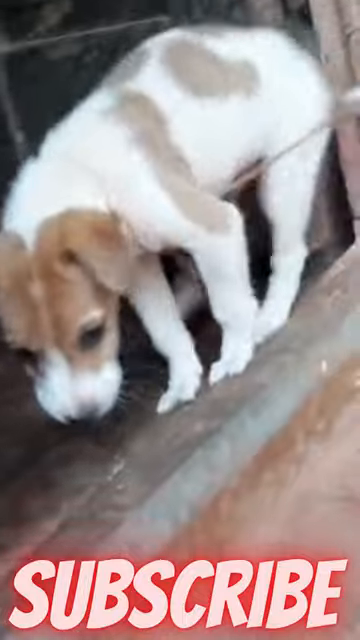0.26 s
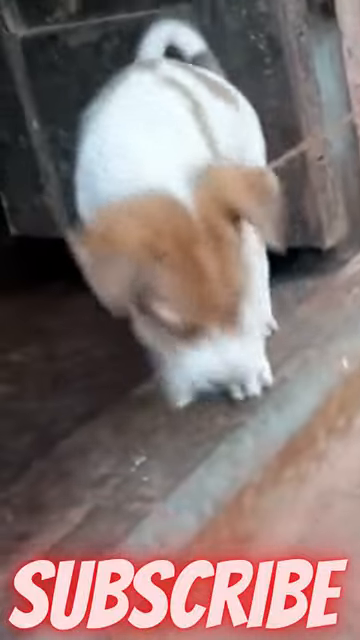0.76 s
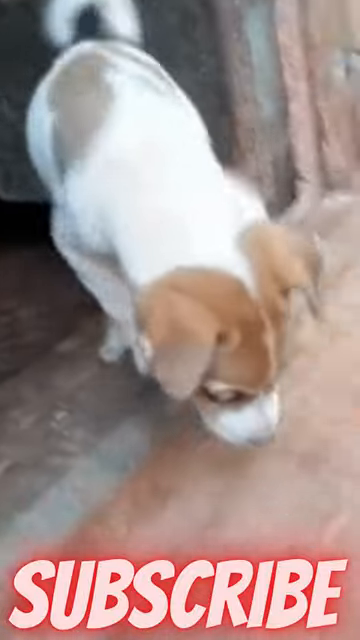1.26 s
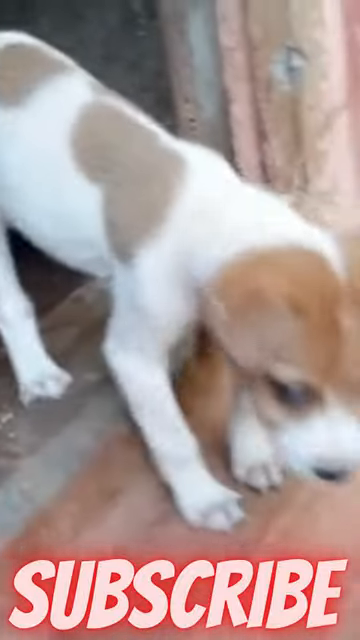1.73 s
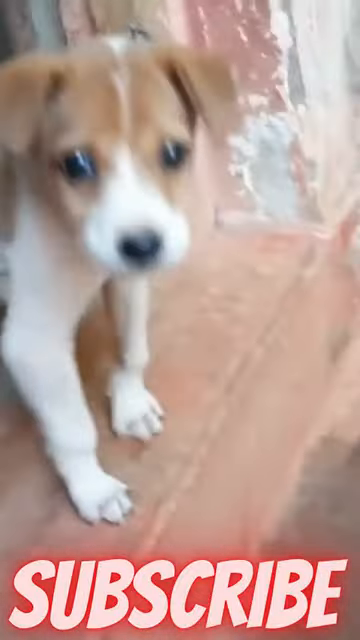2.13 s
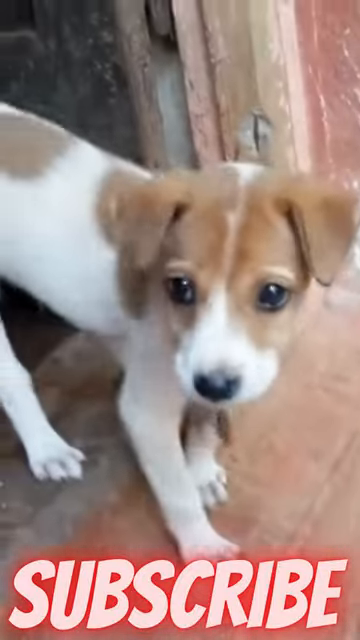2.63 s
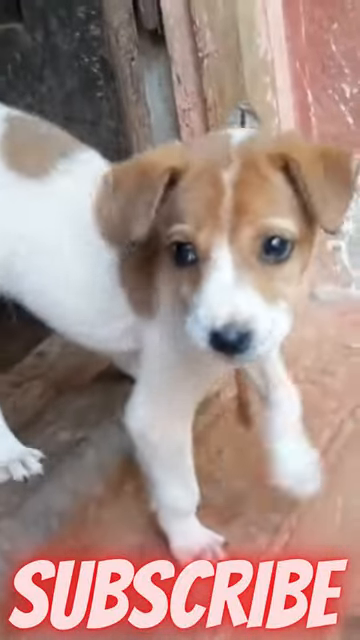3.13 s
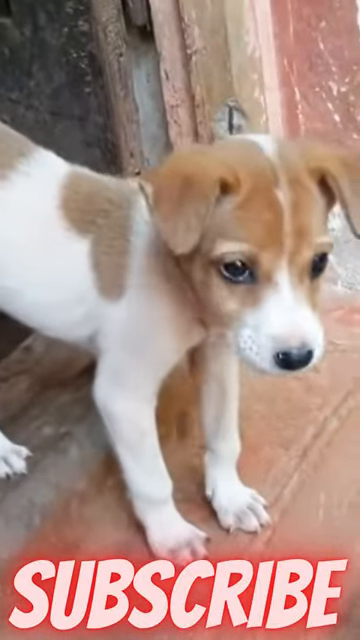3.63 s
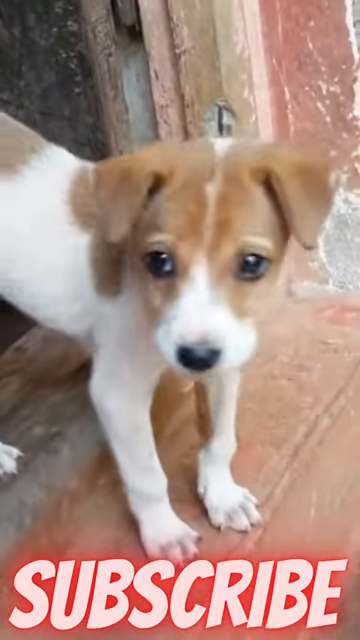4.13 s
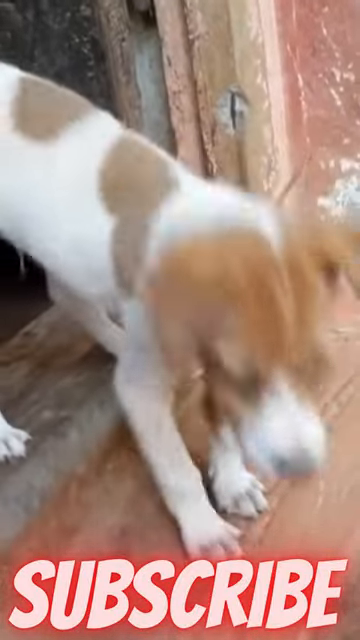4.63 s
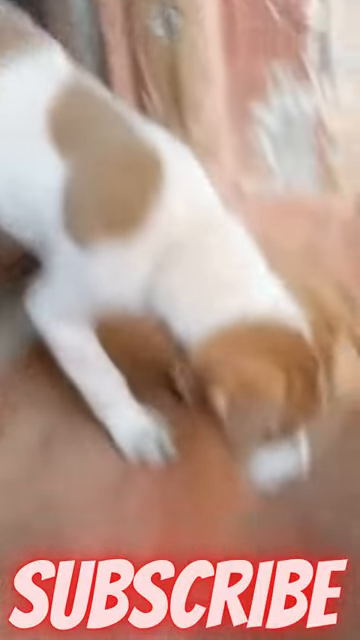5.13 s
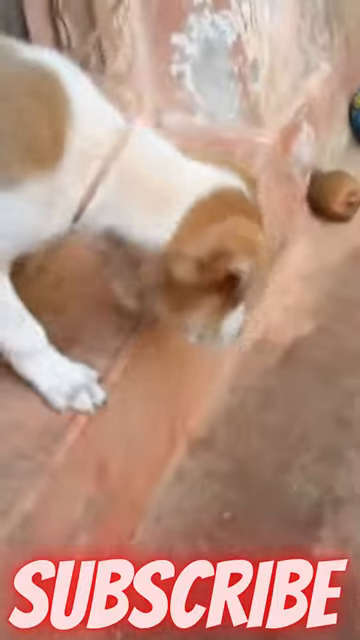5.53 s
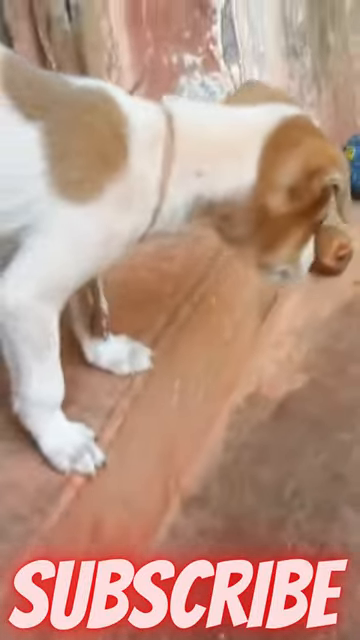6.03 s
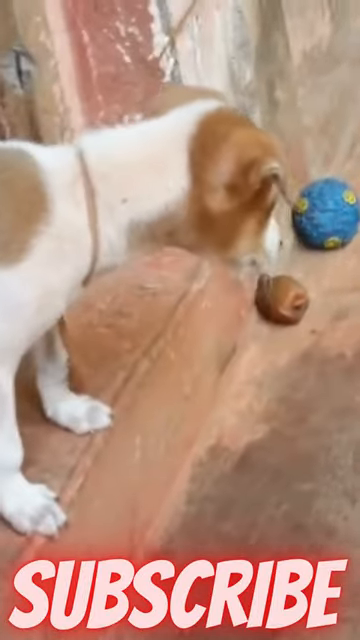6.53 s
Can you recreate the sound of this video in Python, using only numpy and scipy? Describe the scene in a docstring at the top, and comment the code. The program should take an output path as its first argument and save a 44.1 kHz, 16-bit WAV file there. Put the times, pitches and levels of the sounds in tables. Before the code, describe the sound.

At the start a puppy gives a faint, fading yelp over a dull hum that dies away within about half a second. Small grunts, soft paw scuffs and a few claw ticks on concrete follow until about 2 seconds. Then a wooden door is bumped with a hollow knock and rattle, and drags with a low rumble that fades by about 3.5 seconds. The puppy begins short, high, nearly pure whines at about 2.7, 3.5, 4.1 and 4.4 seconds. At 4.8 seconds comes a sharp rising yelp, the loudest sound, followed by a softer warbling yelp at 5.1 seconds. Three quieter, lower whines follow at about 5.5, 5.8 and 6.2 seconds, the last starting with a grunt. Quiet outdoor air lies underneath throughout, and the porch walls add a faint echo.

```python
"""A puppy on a concrete porch yelps over a dying hum and quiet outdoor air; the walls answer faintly.
It grunts, its paws scuff and its claws tick. At two seconds a wooden door is bumped, rings in its
modes and rumbles as it drags. As the rumble fades, nine high calls begin: four whines, a loud yelp,
a warbling yelp and three more whines, the last with a grunt. The vocal folds give a near-pure tone
that brightens under strain, carries a thin whistle and now and then cracks by period doubling."""
import sys
import numpy as np
from scipy import signal
from scipy.fft import rfft, irfft
from scipy.io import wavfile
from scipy.ndimage import uniform_filter1d

SR = 44100
rng = np.random.default_rng(int(sys.argv[2]) if len(sys.argv) > 2 else 0)


def log_audio(samples):
    """Write samples as a 16-bit WAV file to the path given in sys.argv[1]."""
    # one column per channel
    frames = np.atleast_2d(samples).T
    # limit to full scale, then quantise
    limited = np.clip(frames, -1, 1)
    pcm = np.round(limited * 32767).astype(np.int16)
    wavfile.write(sys.argv[1], SR, pcm)


N = 299420
T = np.arange(N) / SR
CUTOFF_HZ = 15750

# vocal tract response, mouth nearly shut and wide open: frequency_hz, gain_db
MOUTH_SHUT = [(2000, 4), (2700, -0.5), (3400, -14), (4200, -4), (5150, 11.5), (5900, -5.5), (7000, -14),
              (8150, -17), (9200, -31.5), (10700, -18), (12000, -28), (15000, -35.5)]
MOUTH_OPEN = [(2000, 1), (2850, -16.5), (3400, -4), (3850, 1.5), (4300, -5), (4750, -2), (5600, -4),
              (6600, -16.5), (9000, -41.5), (15000, -52)]
# spectrum of friction on concrete: frequency_hz, gain_db
FRICTION_SPECTRUM = [(500, -10.5), (1300, 6), (2400, -1), (4900, 2), (6500, -4.5), (9000, -19.5),
                     (15000, -18.5)]


def from_db(db):
    """Decibels to amplitude ratio."""
    return 10 ** (np.asarray(db) / 20)


def unit_rms(x):
    """Normalisation to unit rms."""
    return x / np.sqrt(np.mean(x ** 2) + 1e-20)


def gain_at(spectrum, hz):
    """Gain of a (frequency_hz, gain_db) spectrum, interpolated on logarithmic axes."""
    frequency_hz, gain_db = np.transpose(spectrum)
    return from_db(np.interp(np.log(np.maximum(hz, 1)), np.log(frequency_hz), gain_db))


def colour(x, spectrum, size=4096):
    """Minimum-phase filtering: folding the cepstrum makes the response causal."""
    cepstrum = irfft(np.log(gain_at(spectrum, np.arange(size // 2 + 1) * SR / size)))
    cepstrum[1:size // 2] *= 2
    cepstrum[size // 2 + 1:] = 0
    return signal.fftconvolve(x, irfft(np.exp(rfft(cepstrum))))[:len(x)]


def noise(spectrum, size=N):
    """Spectrally shaped Gaussian noise of unit rms."""
    return unit_rms(colour(rng.standard_normal(size), spectrum))


def wander(rate_hz, size):
    """Low-passed noise: a smooth random fluctuation of unit rms."""
    pole = np.exp(-2 * np.pi * rate_hz / SR)
    white = rng.standard_normal(size + SR // 10)
    return unit_rms(signal.lfilter([1], [1, -2 * pole, pole * pole], white)[-size:])


def resonate(x, hz, width_hz):
    """A second-order resonator with unit peak gain."""
    radius = np.exp(-np.pi * width_hz / SR)
    feedback = [1, -2 * radius * np.cos(2 * np.pi * hz / SR), radius ** 2]
    return signal.lfilter(np.array([1, 0, -1]) * (1 - radius ** 2) / 2, feedback, x)


def gate(t, start, end, edge_s):
    """A time window with raised-cosine edges."""
    return np.sin(np.pi / 2 * np.clip(np.minimum(t - start, end - t) / edge_s + .5, 0, 1)) ** 2


def add(out, start_s, x):
    """Superposition of a short sound at a given time."""
    i = max(round(start_s * SR), 0)
    out[i:i + len(x)] += x[:N - i]


def overtone_gains(pitch_hz, opening, throat_ratio, octave_db, knee_order=5.3, fall_db_per_order=2):
    """Source-filter model: the tract weights harmonics 2-16 of the folds; their total power is one."""
    orders = np.arange(2, 17)[:, None]
    hz = orders * pitch_hz
    tract_hz = hz * throat_ratio   # a longer throat lowers all its resonances
    gains = gain_at(MOUTH_OPEN, tract_hz) ** opening * gain_at(MOUTH_SHUT, tract_hz) ** (1 - opening)
    gains *= from_db(-fall_db_per_order * np.maximum(orders - knee_order, 0)) * (hz < CUTOFF_HZ)
    gains[0] *= from_db(octave_db)
    return gains / np.linalg.norm(gains, axis=0)


def whistle(progress, fold_phase, hoarse_db, jet_db=-12):
    """A jet tone, phase-modulated into sidebands by the folds; part of the jet breaks up into hiss."""
    # pitch arch over a call: share_of_call, pitch_hz
    arch = [(0, 11500), (.3, 13230), (1, 12510)]
    size = len(progress)
    hz = np.interp(progress, *np.transpose(arch))
    hz *= 1 + .008 * wander(25, size) + (.003 + .07 * from_db(hoarse_db)) * wander(400, size)
    tone = np.sin(2 * np.pi * np.cumsum(hz) / SR + 1.8 * np.sin(fold_phase))
    tone *= from_db(2 * wander(30, size))
    jet = unit_rms(resonate(rng.standard_normal(size), 12500, width_hz=3300))
    return tone + from_db(jet_db) * jet


def squeak(from_end_s, end_hz=13040, fall_hz_per_s=19000):
    """A falling chirp: the whistle runs free as a call ends."""
    hz = (end_hz - fall_hz_per_s * from_end_s) * (1 + .028 * wander(460, len(from_end_s)))
    return np.sin(2 * np.pi * np.cumsum(hz) / SR)


def cry(contour, opening, throat_ratio, octave_db, quiver, hoarse_db, whistle_db, squeak_db,
        rasp_db=-5, hiss_db=2, puff_db=-8.5, whistle_swell_db=9, squeak_s=.0098):
    """Phonation: vibrating folds give harmonics and pulse the airflow. Returns start time and sound."""
    # voice cracks: centre_s, half_width_s, depth_ratio
    cracks = [(2.735, 0.0438, 0.21), (4.611, 0.0064, 0.01), (4.838, .015, 0), (5.643, 0.00644, 0.68),
              (5.989, 0.01434, 0.89), (6.236, 0.0086, 0.26)]
    times, *columns = np.transpose(contour)
    start, end = times[0], times[-1]
    t = T[(T > start - .005) & (T < end + .04)]
    size = len(t)
    pitch_hz, level_db, overtones_db = [np.interp(t, times, column) for column in columns]
    pitch_hz = uniform_filter1d(pitch_hz, size=400)   # muscles round off the turns
    closing = np.exp(-((t - end + squeak_s / 2) / squeak_s) ** 2)
    crack = sum(depth * np.exp(-((t - centre) / half) ** 2) for centre, half, depth in cracks)
    # fast jitter grows with hoarseness, in a crack and as the folds let go
    jitter = .09 * from_db(hoarse_db) + .011 * (crack + closing)
    detuning = quiver * wander(46, size) + jitter * wander(250, size)
    phase = 2 * np.pi * np.cumsum(pitch_hz * (1 + detuning)) / SR
    gains = overtone_gains(pitch_hz, opening, throat_ratio, octave_db) * from_db(overtones_db - level_db)
    voice = np.sin(phase)
    for order, gain in enumerate(gains, 2):
        flutter_db = np.sqrt(order) * wander(35, size)
        voice += gain * from_db(flutter_db) * np.sin(order * phase)
    # period doubling: strong and weak cycles alternate in a crack
    voice += crack * (np.sin(phase / 2) + np.sin(1.5 * phase) / 2)
    # turbulence broadens every harmonic and hisses in the mouth
    voice *= 1 + (from_db(hoarse_db + rasp_db) + .36 * crack) * wander(450, size)
    mouth = MOUTH_OPEN if opening > .5 else MOUTH_SHUT
    hiss = noise([(500, -20), *mouth], size) * (1 + np.cos(phase))
    voice += from_db(hoarse_db + hiss_db) * np.linalg.norm(gains[1:], axis=0) * hiss
    voice *= from_db(level_db) * gate(t, start, np.inf, edge_s=.0022) * gate(t, -np.inf, end, edge_s=.012)
    progress = (t - start) / (end - start)
    swell = from_db(whistle_db + whistle_swell_db * (progress - .5))
    voice += swell * whistle(progress, phase, hoarse_db) * gate(t, start + .045, end, edge_s=.03)
    voice += from_db(squeak_db) * closing * (squeak(t - end) + from_db(puff_db) * hiss)
    return t[0], np.sqrt(2) * voice


def grunt(length_s, level_db, pitch_hz, mouth_hz, jitter=.072, breath=.072):
    """Impulse excitation: a few uneven glottal pulses ring the throat and mouth resonances."""
    # throat response: frequency_hz, gain_db
    throat = [(120, -27), (220, -3), (350, -17.5), (540, 7.5), (750, -1.5), (1000, -4.5), (1750, -6),
              (2200, -24.5), (3200, -29.5), (4700, -21.5), (5700, -28), (7500, -49.5)]
    t = T[:SR // 12]
    cycles = np.cumsum(pitch_hz * (1 + jitter * wander(220, len(t)))) / SR
    pulses = np.diff(np.ceil(cycles), prepend=0) + breath * rng.standard_normal(len(t))
    sound = colour(pulses * gate(t, 0, length_s, edge_s=.003), throat)
    sound = .46 * sound + resonate(sound, mouth_hz, width_hz=270)
    return from_db(level_db) * unit_rms(sound) * np.sqrt(length_s / t[-1])


def puppy(catch_s=.0044, catch_hz=1300):
    """All calls and grunts; a glottal transient opens each call as the folds snap apart."""
    # yelp contours: time_s, pitch_hz, fundamental_db, overtones_db
    fading_yelp = [(0.0, 946.7, -35, -15), (0.02, 956.6, -42.5, -19.5), (0.062, 929.9, -42, -17),
                   (0.09, 945.9, -39, -22.5), (0.116, 901.7, -42.5, -25), (0.133, 931.8, -38, -29),
                   (0.19, 906.3, -47.5, -37), (0.212, 898, -40, -56), (0.25, 915.3, -53.5, -52.5)]
    loud_yelp = [(4.781, 1196, -34.5, -46.5), (4.789, 898.7, -43, -52.5), (4.812, 1215, -14.5, -22),
                 (4.839, 1434, -6.5, -18), (4.852, 1582, -12.5, -29), (4.856, 1704, -13, -22),
                 (4.889, 1701, -12, -20), (4.936, 1926, -18.5, -31.5), (4.953, 1660, -20.5, -43.5),
                 (4.958, 1304, -50.5, -52)]
    warbling_yelp = [(5.115, 795, -48, -40.5), (5.16, 989.7, -25, -34), (5.177, 1357, -39.5, -35.5),
                     (5.202, 1265, -37.5, -39), (5.224, 1306, -43.5, -33.5), (5.254, 1113, -36, -39.5),
                     (5.274, 1386, -38, -33.5), (5.3, 1413, -39.5, -39.5), (5.335, 1639, -36, -49),
                     (5.352, 1280, -40.5, -62.5)]
    # short grunts: start_s, length_s, level_db, pitch_hz, mouth_hz
    grunts = [(0.525, 0.00924, -36, 579.8, 543), (1.005, 0.0286, -38, 254.9, 1548),
              (1.365, 0.00635, -55, 588, 640.6), (6.215, 0.0339, -40, 615.3, 748)]
    # whine gestures: start_s, length_s, low_s, scoop_s, flick_s, onset_hz, low_hz, early_hz, middle_hz,
    # late_hz, flick_hz, onset_db, held_db, onset_overtones_db, overtones_db, swell_db
    whines = [(2.722, 0.2026, .034, .046, 0.0089, 732.7, 884.6, 1055, 1123, 1133, 1189, -42.5, -27, -45, -55, -8),
              (3.478, .275, .018, 0.028, 0.0074, 1254, 1153, 1396, 1300, 1377, 1383, -33, -28, -46.5, -41, 2),
              (4.072, 0.17126, 0.0211, 0.0188, 0.0071, 1299, 1124, 1347, 1339, 1319, 1347, -33, -25, -56, -52, 6.5),
              (4.404, .238, 0.0364, .021, 0.00262, 892.4, 958.4, 1424, 1467, 1501, 1810, -41, -21, -63.5, -40, 2),
              (5.490, 0.1725, .018, 0.021, 0.0092, 897.5, 851, 1006, 1009, 1052, 1210, -41.5, -41.5, -48, -42.5, -6),
              (5.808, 0.2181, 0.0123, 0.0402, 0.0251, 803, 818.5, 947, 937.6, 961.5, 1292, -42, -39.5, -53.5, -42.5, -4),
              (6.221, 0.3324, 0.019, 0.03, 0.0055, 631.6, 772.5, 875.9, 821.7, 876.6, 919, -41, -37.5, -46, -44.5, -2)]
    # voice quality of each call in order of time: catch_db, opening_share, throat_ratio, octave_db,
    # quiver_share, hoarse_db, whistle_db, squeak_db
    qualities = [(-86, 0.95, 1.01, 3, .004, -28, -68, -68),
                 (-31.5, 0.53, 0.989, 6.5, 0.0187, -31.5, -58.5, -55.5),
                 (-53.5, 0.07, 1.0993, 1, .004, -34.5, -65, -45),
                 (-43, 0.4, 1.028, 9.5, .003, -34.5, -67, -47.5),
                 (-45.5, 0.4, 0.97, -3.5, 0.0071, -33.5, -60, -50.5),
                 (-33.5, 0.7, 1.0507, 5.5, 0.0024, -34, -50, -53.5),
                 (-41, 0.44, 1.109, 10.5, 0.0087, -25, -59.5, -60),
                 (-40.5, 0.17, 1.108, 4, 0.0058, -21.5, -63.5, -82.5),
                 (-42.5, 0.2, 1.129, 2.5, 0.0027, -32, -70, -59),
                 (-53, 0.3, 1.063, 10.5, .005, -29.5, -104.5, -80)]
    contours = [fading_yelp, loud_yelp, warbling_yelp] + [whine(*row) for row in whines]
    contours.sort(key=lambda contour: contour[0][0])
    out = np.zeros(N)
    for contour, (catch_db, *quality) in zip(contours, qualities):
        start_s, pitch_hz = contour[0][:2]
        add(out, *cry(contour, *quality))
        add(out, start_s, grunt(catch_s, catch_db, pitch_hz, catch_hz))
    for start_s, *shape in grunts:
        add(out, start_s, grunt(*shape))
    return out


def low_hum(level_db=-41, hum_hz=145, t60_s=.61):
    """Narrow-band noise, heard as a dull hum, decays exponentially under the first yelp."""
    band = resonate(rng.standard_normal(N), hum_hz, width_hz=40)
    hum = resonate(band, hum_hz, width_hz=54)
    return unit_rms(hum) * from_db(level_db - 60 * T / t60_s)


def outdoor_air(level_db=-64):
    """Stationary ambient noise, strongest at low frequencies."""
    # background spectrum: frequency_hz, gain_db
    spectrum = [(32, -27), (55, -5), (145, -2.5), (738, -11), (870, -16.5), (1180, -11.5), (1460, -18.5),
                (2290, -21), (3670, -24.5), (15500, -41)]
    return from_db(level_db) * noise(spectrum)


def porch(x, early_db=-14, early_t60_s=.053, late_db=-26.5, late_t60_s=.36):
    """Reverberation: early reflections from floor and door, then a faint diffuse tail from the walls."""
    # spectrum of the reflections: frequency_hz, gain_db
    walls = [(150, -16.5), (1200, 3.5), (3400, 3.5), (5200, 9.5), (12000, 8)]
    t = T[:SR]
    early = rng.standard_normal(SR) * from_db(-60 * t / early_t60_s) * (t > .004)
    late = rng.standard_normal(SR) * from_db(-60 * t / late_t60_s) * (t > .012)
    echoes = (from_db(early_db) * unit_rms(early) + from_db(late_db) * unit_rms(late)) / np.sqrt(SR)
    return x + signal.fftconvolve(x, colour(echoes, walls))[:N]


def paw_scuffs(grit_db=2):
    """Sliding friction: paws rub the concrete, and grit makes the noise uneven."""
    # paw strokes: centre_s, half_width_s, level_db
    strokes = [(0.58, 0.156, -70), (1.947, 0.093, -68.5), (2.533, 0.018, -62), (2.93, 0.0847, -57.5),
               (3.257, 0.0845, -62.5)]
    envelope = sum(from_db(db) * np.exp(-((T - centre) / half) ** 2) for centre, half, db in strokes)
    return envelope * noise(FRICTION_SPECTRUM) * from_db(grit_db * wander(60, N))


def claw_ticks(grit=.32):
    """Damped impacts: each claw on the concrete gives a brief resonance and a gritty scratch."""
    # claw strikes: start_s, level_db, ring_hz, decay_s
    strikes = [(0.838, -57.5, 4500, 0.0052), (1.801, -50, 5200, 0.00235), (1.869, -42.5, 2240, 0.00107)]
    out, t = np.zeros(N), T[:SR // 20]
    for start_s, level_db, ring_hz, decay_s in strikes:
        scratch = rng.standard_normal(len(t))
        tick = resonate(scratch, ring_hz, width_hz=680) + grit * colour(scratch, FRICTION_SPECTRUM)
        add(out, start_s, from_db(level_db) * unit_rms(tick) * np.exp(-t / decay_s))
    return out


def door_bumps(rattle_db=-4.5, rattle_t60_s=.335, rise_s=.0124):
    """Modal vibration: blows ring the wooden panel and shake its loose boards."""
    # panel modes: frequency_hz, gain_db, t60_s
    modes = [(173.7, -1, 0.355), (195.23, 7.5, 0.2466), (304.2, -9.5, 0.547), (423, -34.5, 0.13),
             (620, -25.5, 0.29), (641.7, -5.5, 0.317), (950, -33, 0.16), (1047, -20.5, 0.46),
             (1250, -25, 0.32)]
    # a hit and its chatter: start_s, gain_db
    blows = [(2.050, -22.5), (2.066, -35.5), (2.096, -32), (2.138, -36.5)]
    # spectrum of the loose boards: frequency_hz, gain_db
    rattle = [(80, -32), (170, -2.5), (250, 9.5), (400, -8), (700, 5), (1200, -10.5), (2000, -21.5),
              (3500, -27), (12000, -77.5)]
    out, t = np.zeros(N), T[:SR]
    panel = sum(from_db(db - 60 * t / t60_s) * np.sin(2 * np.pi * hz * t) for hz, db, t60_s in modes)
    for start_s, gain_db in blows:
        boards = noise(rattle, SR) * from_db(rattle_db - 60 * t / rattle_t60_s)
        add(out, start_s, from_db(gain_db) * (panel + boards) * (1 - np.exp(-t / rise_s)))
    return out


def door_drag():
    """Friction on the sill: the rumble follows each shove, and overlapping shoves add in power."""
    # shoves on the door: peak_s, peak_db, rise_s, fall_s
    shoves = [(2.04, -47, 0.0476, 0.27), (2.49, -48, 0.047, 0.12), (2.731, -42, 0.1016, 0.1116),
              (3.27, -55, 0.0385, 0.09)]
    # rumble spectrum: frequency_hz, gain_db
    rumble = [(60, -31.5), (120, -20), (155, -5), (190, 3.5), (240, -15.5), (310, -14.5), (650, -18),
              (2200, -33.5), (5000, -36.5), (12000, -73)]
    forces = [from_db(peak_db) * np.exp(np.minimum((T - peak_s) / rise_s, (peak_s - T) / fall_s))
              for peak_s, peak_db, rise_s, fall_s in shoves]
    return np.linalg.norm(forces, axis=0) * noise(rumble)


def whine(start_s, length_s, low_s, scoop_s, flick_s, onset_hz, low_hz, early_hz, middle_hz, late_hz,
          flick_hz, onset_db, held_db, onset_overtones_db, overtones_db, swell_db,
          bloom_s=.007, flick_rise_s=.018, drop_s=.02, drop_ratio=.79, loss_db_per_octave=13.5):
    """Pitch and level modulation, as a contour for cry: low start, scoop, held note, flick up, drop."""
    end_s = start_s + length_s
    held_from = start_s + low_s + scoop_s
    held_to = end_s - drop_s - flick_s - flick_rise_s
    thin_db = loss_db_per_octave * np.log2(flick_hz / late_hz)   # the voice thins as it flicks up
    early_overtones_db, late_overtones_db = overtones_db - swell_db / 2, overtones_db + swell_db / 2
    flick_overtones_db = late_overtones_db - thin_db
    flick = (flick_hz, held_db - thin_db, flick_overtones_db)
    return [(start_s, onset_hz, onset_db, onset_overtones_db),
            (start_s + low_s, low_hz, onset_db, onset_overtones_db),
            (held_from, early_hz, held_db, early_overtones_db - 2.5),
            (held_from + bloom_s, early_hz, held_db, early_overtones_db),   # the overtones bloom
            ((held_from + held_to) / 2, middle_hz, held_db, overtones_db),
            (held_to, late_hz, held_db, late_overtones_db),
            (held_to + flick_rise_s, *flick),
            (end_s - drop_s, *flick),
            (end_s - drop_s / 2, late_hz, held_db - .5, flick_overtones_db),   # back through the note
            (end_s, late_hz * drop_ratio, held_db - 7.5, flick_overtones_db - 26.5)]


def scene():
    """Superposition in mono: puppy, door and paws reverberate on the porch, over the hum and the air."""
    direct = puppy() + door_bumps() + door_drag() + paw_scuffs() + claw_ticks()
    return (porch(direct) + low_hum() + outdoor_air())[None]


def record(dry):
    """Band limiting: an elliptic low-pass filter cuts the top treble steeply."""
    return signal.sosfilt(signal.ellip(12, .1, 90, CUTOFF_HZ, fs=SR, output="sos"), dry)


dry = scene()
out = record(dry)
log_audio(out)
```